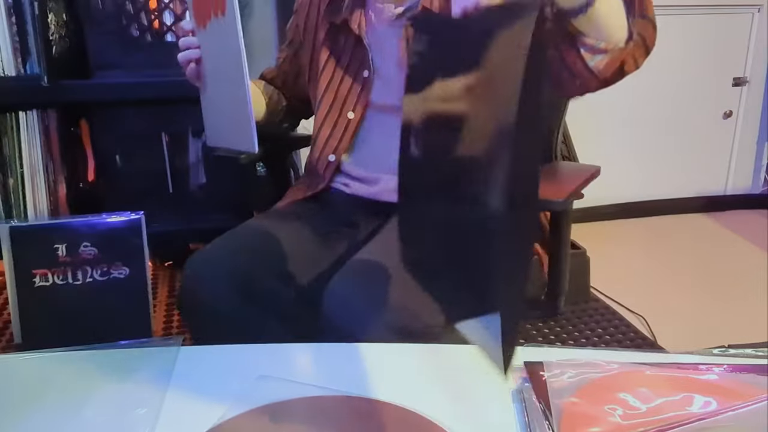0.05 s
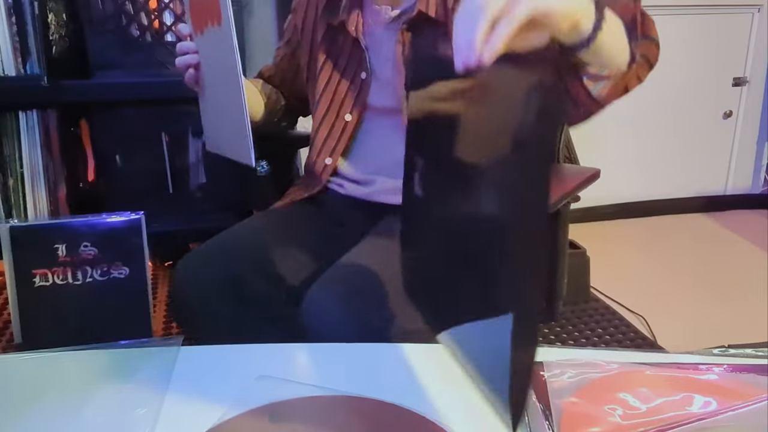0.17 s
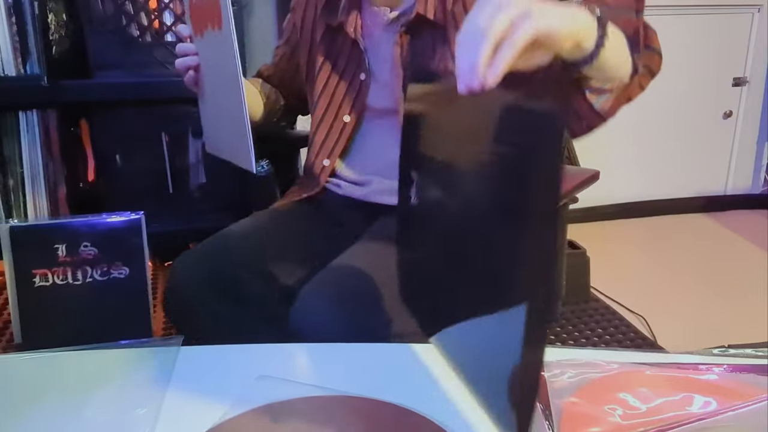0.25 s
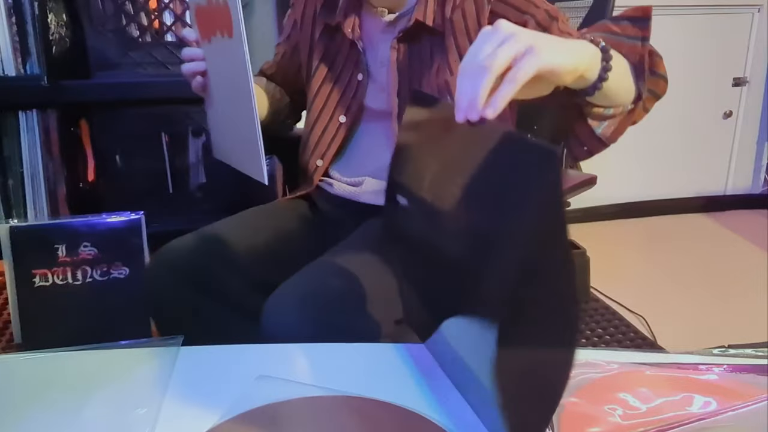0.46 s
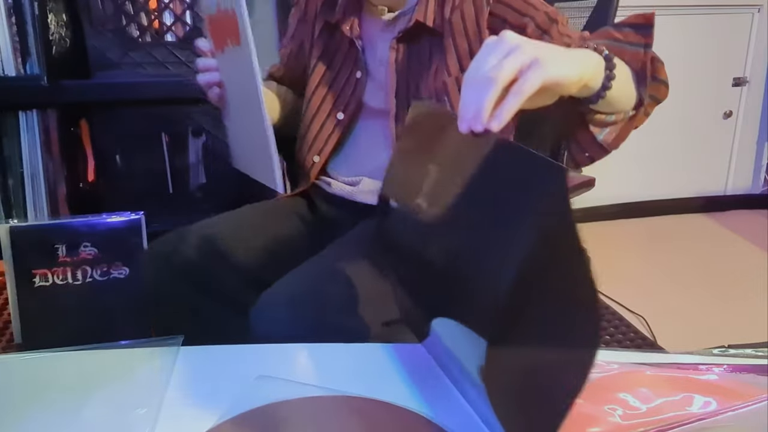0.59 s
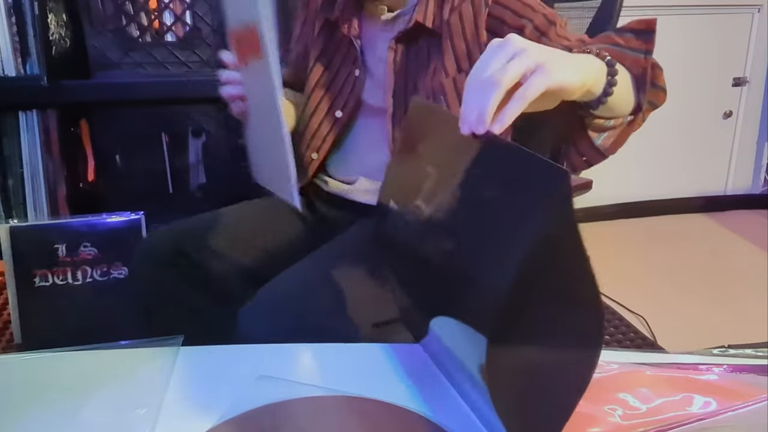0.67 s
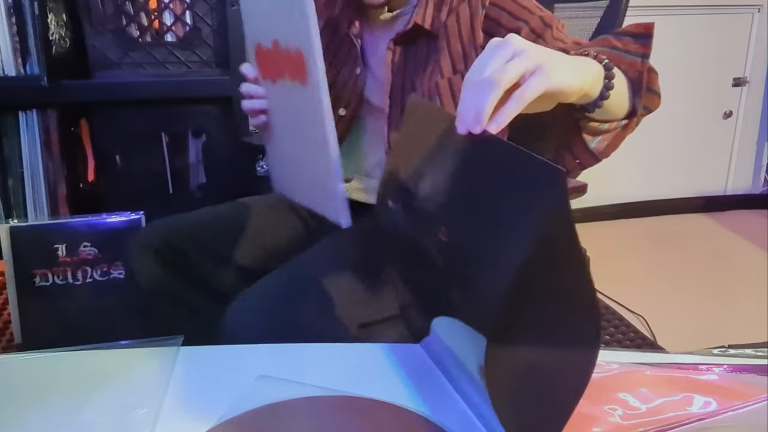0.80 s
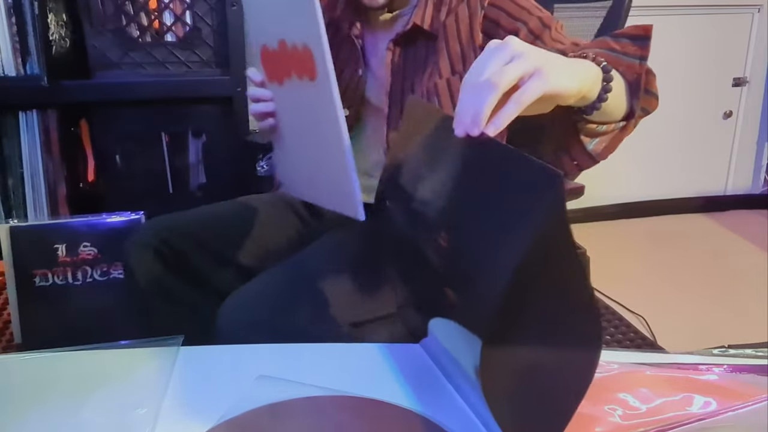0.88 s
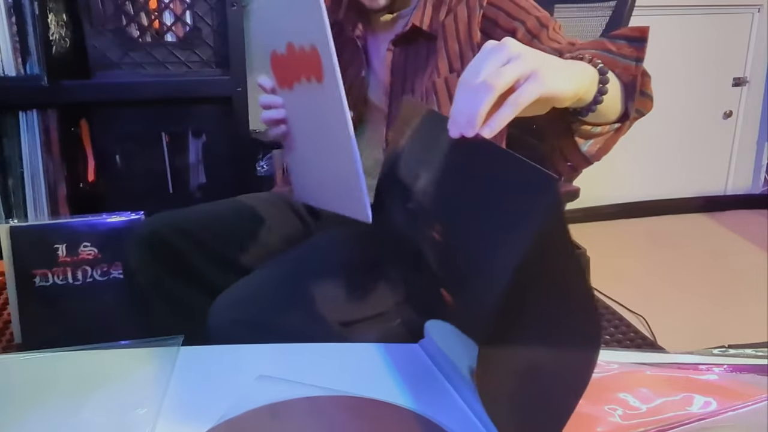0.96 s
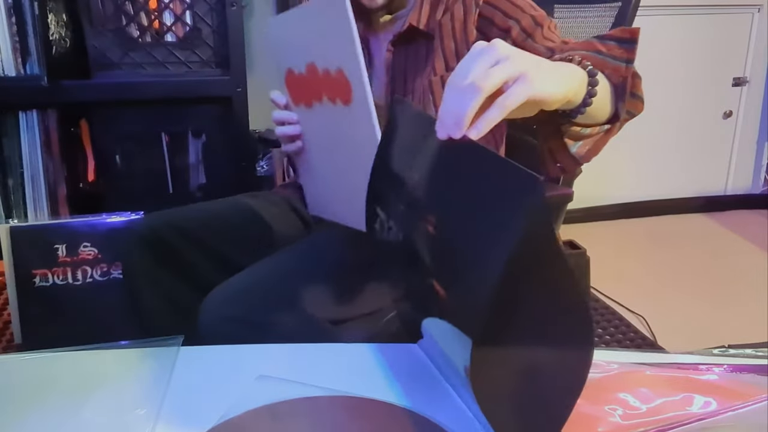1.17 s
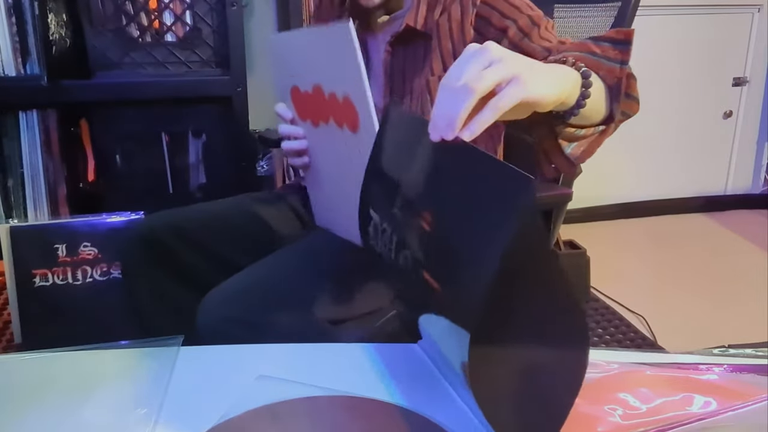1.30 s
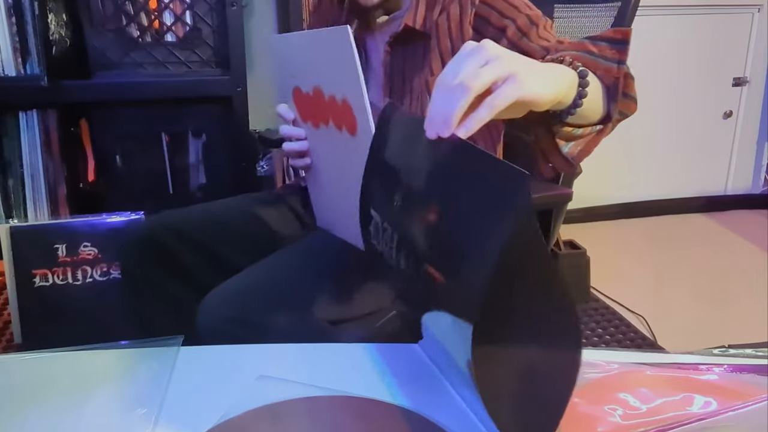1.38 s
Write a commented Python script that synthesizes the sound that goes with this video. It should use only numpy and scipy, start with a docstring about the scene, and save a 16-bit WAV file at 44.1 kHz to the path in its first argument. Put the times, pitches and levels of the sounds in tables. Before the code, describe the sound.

Hollow cardboard thump and a short papery slide as a record jacket is handled indoors.

```python
"""A small room, with a cardboard record jacket handled close to the microphone.
An edge knocks, the flat side thumps down and the board flaps twice; each blow sets the card ringing.
The sleeved disc slides along the card with a papery rustle of friction and a few ticks, and a soft
bump follows. The room echoes, longest in the bass, and mains hum buzzes faintly behind it all."""
import sys
import numpy as np
from scipy import signal
from scipy.io import wavfile

SR = 44100
rng = np.random.default_rng(int(sys.argv[2]) if len(sys.argv) > 2 else 0)


def dump(signal):
    """Clip the signal to [-1, 1] and save it as 16-bit WAV at the path in sys.argv[1]."""
    limited = np.clip(np.atleast_2d(signal).T, -1, 1)
    pcm = np.round(limited * 32767).astype(np.int16)
    wavfile.write(sys.argv[1], SR, pcm)


N = 63945
T = np.arange(N) / SR
BAND_EDGES_HZ = 31.25 * 2 ** (np.arange(19) / 2)


def from_db(db):
    """Decibels to gain."""
    return 10 ** (np.asarray(db) / 20)


def rms_one(x):
    """Scale to an rms of 1."""
    return x / np.sqrt(np.mean(x ** 2) + 1e-20)


def level(curve):
    """Gain over time from (time_s, level_db) points."""
    return from_db(np.interp(T, *np.transpose(curve)))


def at_hz(table, hz, column=1):
    """Read a column of a table on a log-frequency axis."""
    columns = np.transpose(table)
    return np.interp(np.log(hz), np.log(columns[0]), columns[column])


def cut(x, hz, kind, order=2):
    """Butterworth filter."""
    sos = signal.butter(order, np.clip(hz, 10, .48 * SR), kind, fs=SR, output="sos")
    return signal.sosfilt(sos, x + 1e-18)


def dying(t60_s):
    """Exponential decay, 60 dB down after t60_s."""
    return np.exp(-np.log(1000) * T / t60_s)


def ring(hz, db, t60_s):
    """A decaying sine."""
    return from_db(db) * np.sin(2 * np.pi * hz * T) * dying(t60_s)


def delayed(x, start_s):
    """Start a sound at a given time."""
    return np.concatenate([np.zeros(int(start_s * SR)), x])[:N]


def resonate(x, hz, width_hz):
    """Two-pole resonance; rms 1."""
    radius = np.exp(-np.pi * width_hz / SR)
    feedback = [1, -2 * radius * np.cos(2 * np.pi * hz / SR), radius ** 2]
    return rms_one(signal.lfilter([1, 0, -1], feedback, x))


def white():
    """White noise."""
    return rng.standard_normal(N)


def grains(per_s=7000, spread_db=2.5):
    """Tiny slips of fibre on fibre, at random times and of uneven size."""
    sizes = from_db(spread_db * np.minimum(rng.exponential(1, N), 4))
    signs = rng.choice([-1, 1], N)
    return sizes * signs * (rng.random(N) < per_s / SR)


def bands(source=white):
    """Half-octave bands of a noise source as (centre_hz, signal of rms 1)."""
    return [(np.sqrt(low * high), rms_one(cut(source(), [low, high], "band", order=3)))
            for low, high in zip(BAND_EDGES_HZ, BAND_EDGES_HZ[1:])]


def coloured(colour, source=white):
    """Noise shaped by relative levels per half octave; rms 1."""
    return rms_one(sum(from_db(at_hz(colour, hz)) * band for hz, band in bands(source)))


# Odd harmonics of the mains: harmonic, level_db
HUM_HARMONICS = [(1, -73.5), (3, -62), (5, -68.5), (7, -70.5), (9, -74.5), (11, -72.5), (13, -72.5),
                 (15, -88.5), (17, -80), (19, -81.5), (21, -82.5), (23, -97.5)]
# Spectrum of the buzz: band_hz, relative_db
BUZZ_SPECTRUM = [(100, -21), (300, -5), (600, -1), (1200, -2), (2000, -9.5), (3500, -13.5), (8000, -34)]


def mains_hum(mains_hz=60, scatter_rad=.74, buzz_db=-68):
    """Faint in the background: mains harmonics and a buzz on every half cycle."""
    phase = 2 * np.pi * mains_hz * T
    hum = sum(np.sqrt(2) * from_db(db) * np.cos(harmonic * phase + scatter_rad * rng.normal())
              for harmonic, db in HUM_HARMONICS)
    buzz = rms_one(coloured(BUZZ_SPECTRUM) * np.cos(phase) ** 4)
    return hum + from_db(buzz_db) * buzz


# Spectrum of the quiet room: band_hz, relative_db
ROOM_TONE_SPECTRUM = [(30, -30), (60, -12.5), (115, 3), (250, -6), (600, -1.5), (1200, -3.5), (2500, -12),
                      (5000, -12), (9000, -10), (14000, -6)]


def room_tone(level_db=-63):
    """The steady noise of the room around the microphone."""
    return from_db(level_db) * coloured(ROOM_TONE_SPECTRUM)


# Echo of the small room: band_hz, gain_db, t60_s
ROOM_ECHO = [(60, -21.5, 0.69), (130, -6.5, 0.61), (300, -12, .45), (790, -18.5, 0.21), (1990, -26, .45),
             (6000, -25, 0.26), (15000, -32, .2)]


def room_echo(sound, rise_s=.015):
    """A diffuse echo off the walls that lasts longest in the bass."""
    onset = 1 - np.exp(-T / rise_s)
    response = 0
    for (hz, band), width_hz in zip(bands(), np.diff(BAND_EDGES_HZ)):
        tail = rms_one(band * dying(at_hz(ROOM_ECHO, hz, column=2)) * onset)
        unity_gain = np.sqrt(2 * width_hz / SR / N)
        response += from_db(at_hz(ROOM_ECHO, hz)) * tail * unity_gain
    return signal.fftconvolve(sound, response)[:N]


def room_resonances(boom_hz=133.9, boom_rise_s=.015, ring_hz=514):
    """A blow sets off a bass boom and a faint, long ring in the room; as (pitch_hz, sound)."""
    boom = ring(boom_hz, db=-22, t60_s=.36) * (1 - np.exp(-T / boom_rise_s))
    return [(boom_hz, boom), (ring_hz, ring(ring_hz, db=-45, t60_s=1.1))]


# Small paper ticks: start_s, level_db, low_hz, high_hz, decay_s
PAPER_TICKS = [(0.2317, -37.5, 3000, 12000, 0.00064), (0.2343, -45, 5500, 8000, 0.0015),
               (0.5, -76, 3000, 13000, .001), (0.5117, -48, 3200, 10500, .0009),
               (0.976, -67, 2000, 5930, 0.0096), (1.367, -55, 3070, 5650, 0.0042)]


def paper_ticks():
    """Paper edges catch and snap free."""
    out = 0
    for start_s, db, low_hz, high_hz, decay_s in PAPER_TICKS:
        snap = rms_one(cut(white(), [low_hz, high_hz], "band")) * np.exp(-T / decay_s)
        out += delayed(from_db(db) * snap, start_s)
    return out


# Course of the paper's hiss: time_s, level_db
BRUSH_LEVEL = [(.25, -82), (.3, -64.5), (.4, -86), (.47, -99), (.54, -96), (.62, -99), (.7, -110)]
# Spectrum of that hiss: band_hz, relative_db
BRUSH_SPECTRUM = [(2000, -31), (4500, -9), (7000, -5), (9000, -12.5), (13000, -14.5), (16000, -20)]


def paper_brushing():
    """Brushing paper gives a brief, grainy hiss."""
    return level(BRUSH_LEVEL) * coloured(BRUSH_SPECTRUM, grains)


# Course of the sleeve's wobble: time_s, level_db
FLEX_LEVEL = [(.3, -70), (.4, -43.5), (.48, -59), (.54, -62), (.575, -48), (.61, -68.5), (.7, -56.5),
              (.8, -59), (.89, -57), (.97, -63), (1.3, -78), (1.45, -61.5)]


def sleeve_flexing(pitch_hz=130):
    """The sleeve bends with a low wobble."""
    wobble = resonate(white(), pitch_hz, width_hz=59)
    return level(FLEX_LEVEL) * rms_one(cut(wobble, 2 * pitch_hz, "low"))


# Course of card sliding on card: time_s, level_db
SLIDE_LEVEL = [(.27, -68), (.32, -47.5), (.38, -43), (.45, -42.5), (.5, -44.5), (.545, -51.5), (.6, -55),
               (.67, -62), (.8, -68), (.95, -71), (1.1, -80.5), (1.45, -67.5)]
# Spectrum of the rubbed card: band_hz, relative_db
SLIDE_SPECTRUM = [(100, -21.5), (250, -2.5), (500, -7), (900, 1.5), (1500, 2), (2300, -4), (3300, -3.5),
                  (4500, -25.5), (6500, -32.5), (9500, -27), (13000, -41)]
# Resonances of the open sleeve: pitch_hz, width_hz, relative_db
SLEEVE_RESONANCES = [(510, 5.6, 3.5), (623, 10, -2), (843, 18, -4), (878, 13, -1), (1184, 19, -2.5),
                     (1240, 9.6, -4), (1434, 30, -3), (1650, 50, -4.5), (1744, 20, -5.5), (1995, 22, -6),
                     (2305, 25, -10.5), (2390, 40, -12), (3000, 75, -6)]


def sleeve_sliding(hollow_db=.5):
    """Friction grains sound through the card and the hollow of the open sleeve."""
    friction = grains()
    hollow = sum(from_db(db) * resonate(friction, hz, width) for hz, width, db in SLEEVE_RESONANCES)
    card = coloured(SLIDE_SPECTRUM, grains)
    return level(SLIDE_LEVEL) * rms_one(card + from_db(hollow_db) * rms_one(hollow))


# Modes of the cardboard: pitch_hz, relative_db, t60_s
CARD_MODES = [(193.34, -22, 0.45), (241.3, -23.5, .17), (288, -20.5, 0.2), (317.5, -18.5, .2),
              (353.7, -19.5, 0.13), (431, -22, 0.14), (532.2, -14, 0.13), (606.7, -17.5, 0.11),
              (781, -21, .12), (878, -23, .12), (997, -20, 0.17), (1351, -15.5, 0.073), (1492, -15, 0.074),
              (1792, -26, .1), (2240, -28, .1)]
# Its dense ringing, per half octave: band_hz, relative_db, t60_s
CARD_WASH = [(55, -59.5, 0.24), (90, -35, 0.21), (150, -28, 0.24), (300, -20, 0.097), (600, -18, 0.15),
             (1300, -17.5, 0.11), (2000, -23, 0.069), (2950, -26.5, 0.12), (4500, -47.5, 0.16),
             (8000, -53.5, 0.087), (14000, -60.5, 0.056)]


def board_ringing(build_cycles=.76):
    """The struck board's modes and dense ringing build up over about a cycle; as (pitch_hz, sound)."""
    def swell(hz):
        return 1 - np.exp(-T * hz / build_cycles)
    parts = [(hz, (-1) ** k * ring(hz, db, t60_s) * swell(hz))
             for k, (hz, db, t60_s) in enumerate(CARD_MODES)]
    for hz, band in bands():
        envelope = swell(hz) * dying(at_hz(CARD_WASH, hz, column=2))
        wash = rms_one(band * envelope) * np.sqrt(np.mean(envelope ** 2))
        parts.append((hz, from_db(at_hz(CARD_WASH, hz)) * wash))
    return parts


def air_slap(pitch_hz=850):
    """Air is squeezed out under a blow; as (pitch_hz, sound)."""
    return [(pitch_hz, -ring(pitch_hz, db=-4, t60_s=.01))]


def dry_crack(crack_decay_s=.00085, crinkle_decay_s=.015, crinkle_db=-13):
    """The card gives a dry crack, and its fibres crackle after it."""
    crack = cut(white() * np.exp(-T / crack_decay_s), [2800, 8400], "band", order=1)
    fibres = rms_one(grains(per_s=780)) * np.exp(-T / crinkle_decay_s)
    return crack + from_db(crinkle_db) * cut(fibres, [3500, 3700], "band")


# Blows on the jacket: start_s, bass_db, hollow_db, knock_db, edge_db, crack_db
JACKET_BLOWS = [(0.2075, -1, -24, -4.5, -2.5, -35.5), (0.2181, -8, -11.5, -20, -19, -46),
                (0.2399, 0.5, 1.5, 1.5, 2.5, -46), (0.2477, -4, -9, -20, -16, -35),
                (0.3041, -20, -5.5, -39.5, -26.5, -57), (0.318, -37, -10.5, -36.5, -44, -66),
                (0.3339, -27, -10, -36.5, -48, -65), (0.392, -34, -36, -47, -47, -66),
                (0.531, -25, -41.5, -35, -43, -73), (0.556, -18, -48.5, -37, -56, -74),
                (1.363, -44, -45.5, -55, -57, -77), (1.387, -35, -36, -47, -40, -68.5)]
TONE_HZ = [130, 430, 1300, 2600]   # where bass, hollow, knock and edge apply


def jacket_blows():
    """Close to the microphone: edge knocks are hard, flat thumps are full, flaps and bumps are dull."""
    pitches, sounds = map(np.array, zip(*(air_slap() + room_resonances() + board_ringing())))
    out = 0
    for start_s, *tone_db, crack_db in JACKET_BLOWS:
        gains = from_db(np.interp(np.log(pitches), np.log(TONE_HZ), tone_db))
        body = gains @ sounds
        out += delayed(body + from_db(crack_db) * dry_crack(), start_s)
    return out


def scene():
    """At one microphone: the handling nearby, its echo, and the hum and room tone behind."""
    handling = jacket_blows() + paper_ticks() + sleeve_sliding() + paper_brushing() + sleeve_flexing()
    return (handling + room_echo(handling) + mains_hum() + room_tone())[None]


def record(dry, ceiling=1.4, low_cut_hz=70, high_cut_hz=16000):
    """The loudest peaks are rounded, the microphone drops the deep bass and the top is cut."""
    rounded = ceiling * np.tanh(dry / ceiling)
    heard = cut(rounded, low_cut_hz, "high", order=3)
    steep_low_pass = signal.ellip(10, .1, 70, high_cut_hz, fs=SR, output="sos")
    return signal.sosfilt(steep_low_pass, heard)


dry = scene()
out = record(dry)
dump(out)
```